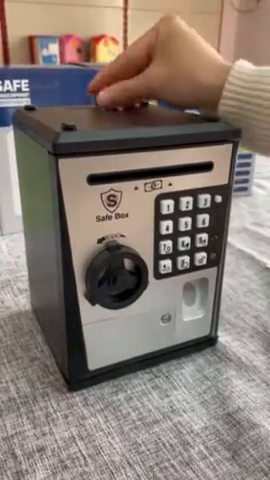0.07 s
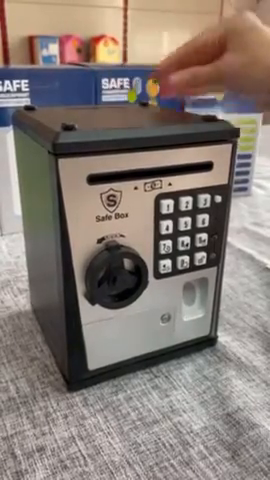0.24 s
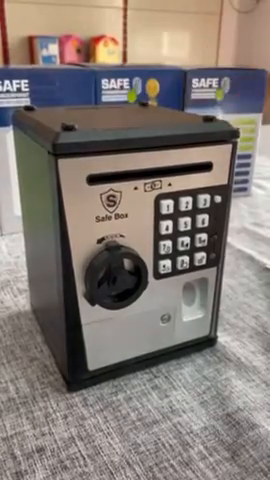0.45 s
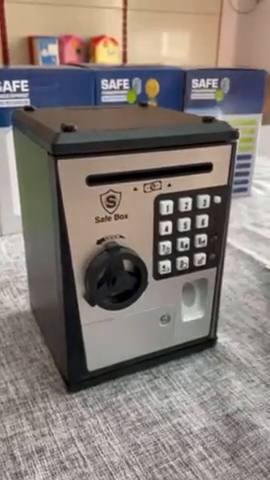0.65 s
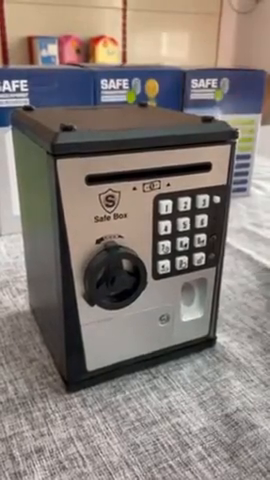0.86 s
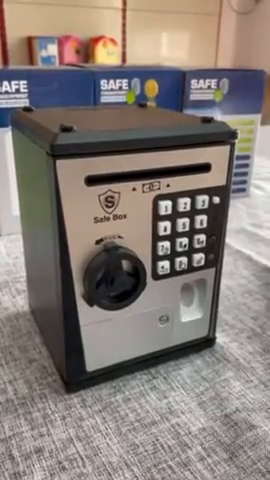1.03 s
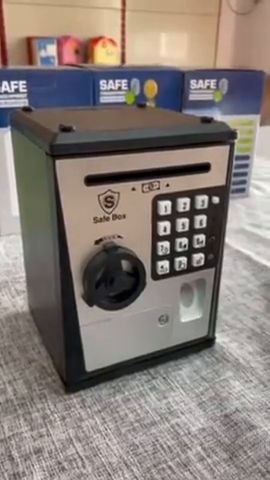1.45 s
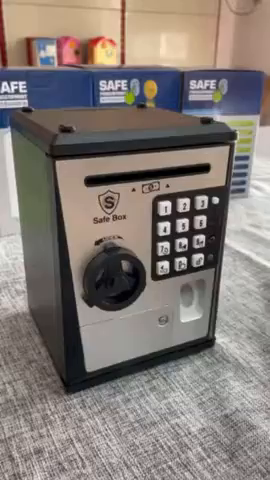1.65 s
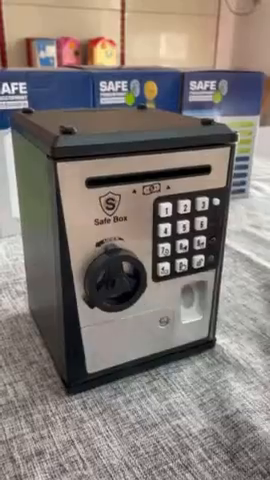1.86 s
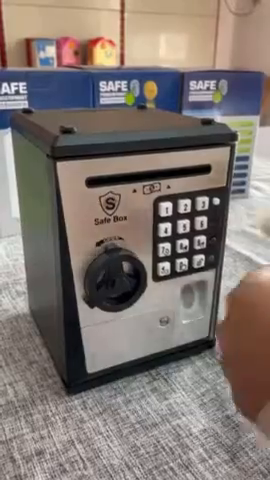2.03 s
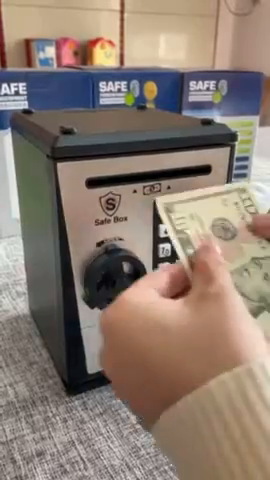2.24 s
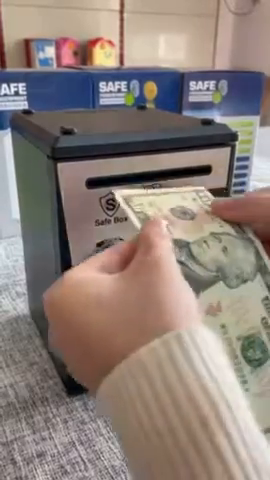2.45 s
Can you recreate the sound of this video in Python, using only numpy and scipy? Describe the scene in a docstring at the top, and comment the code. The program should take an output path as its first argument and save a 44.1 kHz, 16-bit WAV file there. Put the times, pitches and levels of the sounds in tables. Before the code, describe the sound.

Coin clattering into a plastic money box, then wobbling to rest with quickening ticks.

```python
"""A coin drops into a toy safe

A coin scrapes through the slot of a plastic toy safe in a small room. It lands and bounces twice,
making both box and coin ring. Then it wobbles on its ridged rim, rubbing the plastic in quickening
swells until it lies flat. A few dry snaps are heard, and a banknote crinkles faintly afterwards.
An appliance hums in the background over a low rumble."""
import sys
import numpy as np
from scipy import signal
from scipy.fft import rfft, irfft
from scipy.io import wavfile

SR = 44100
rng = np.random.default_rng(int(sys.argv[2]) if len(sys.argv) > 2 else 0)


def generate_wav(signal):
    """Clip the signal to [-1, 1] and save it as 16-bit WAV at the path in sys.argv[1]."""
    frames = np.transpose(np.atleast_2d(signal))
    scaled = np.clip(frames, -1, 1) * 32767
    pcm = np.round(scaled).astype(np.int16)
    wavfile.write(sys.argv[1], SR, pcm)


N = 114660
TIME = np.arange(N) / SR
FREQS = np.maximum(np.fft.rfftfreq(N, 1 / SR), 1)
BOX_CONTACT_HZ = 4940   # pushes on the box are softened above this pitch
RIGHT_LAG_S = 0.0001968   # the box is nearer to the left ear

# Each rub or wobble of the rim: (middle [s], level [dB], half-width [s], pitch of the box floor [Hz])
ROLLS = [(.106, -42.5, 0.0069, 1655), (0.232, -24.5, 0.0056, 1500), (0.284, -24.5, 0.0051, 1690),
         (0.438, -28, 0.022, 1660), (0.511, -34, 0.0074, 1600), (0.542, -26, 0.016, 1615),
         (0.62, -26.5, 0.0079, 1660), (.700, -26.5, 0.0075, 1790), (0.777, -25, 0.0055, 1660),
         (0.85, -24.5, 0.0044, 1450), (0.921, -28.5, 0.0068, 1700), (0.986, -31, 0.0082, 1760),
         (1.05, -28.5, 0.0057, 1790), (1.116, -28, 0.0058, 1548), (1.172, -26, 0.006, 1593),
         (1.227, -26.5, 0.0045, 1640), (1.28, -31.5, 0.011, 1694), (1.332, -30.5, 0.0082, 1692),
         (1.379, -28.5, 0.0061, 1526), (1.425, -25, 0.0045, 1573), (1.467, -26.5, 0.0057, 1581),
         (1.506, -31, 0.0088, 1558), (1.541, -31, 0.0069, 1730), (1.574, -33, 0.012, 1611),
         (1.606, -26.5, 0.0042, 1680), (1.634, -26.5, 0.0048, 1580), (1.66, -33, 0.0073, 1607),
         (1.684, -32.5, 0.0081, 1437), (1.698, -32, 0.0052, 1578), (1.715, -29.5, 0.004, 1720),
         (1.725, -34.5, 0.003, 1500)]
# The box's natural tones. A fade time, or t60, is how long a sound takes to drop by 60 dB.
# (pitch [Hz], fade time [s], level when struck [dB], level when rolled on [dB], left minus right [dB])
BOX_TONES = [(361.7, 0.061, -0.5, -3, 8), (409, 0.042, -1.5, -14, 3), (666.6, 0.049, -1, -2.5, 13.5),
             (828, 0.12, -19.5, -17, 16.5), (902, 0.059, -8.5, -15.5, 4), (1006, 0.044, -10.5, -20, 29),
             (1270, 0.042, -7.5, -4, 12.5), (1552, 0.0097, -1.5, 2, 21), (1585, 0.034, -19, -2, 4.5),
             (2275, 0.064, -22, -5.5, 16), (2816, 0.03, -9, 1, 4), (3014, 0.02, -9.5, -9.5, -13),
             (3368, 0.035, -6.5, -2.5, -12.5), (4417, 0.031, -9.5, -4, -6)]
# How far the sound of the plastic walls leans left: (frequency [Hz], left minus right [dB])
WALL_BALANCE = [(200, -0.5), (600, 22), (1300, 15), (2300, -4), (3400, 10), (5000, -0.5), (14000, 0)]
# How alike the plastic walls sound in both ears: (frequency [Hz], likeness [1 = same, 0 = unrelated])
WALL_LIKENESS = [(200, 0.27), (700, 0.96), (1500, 0.7), (4500, 0.23), (7600, 1), (10000, 0.77)]
# The same for the echo and the banknote: (frequency [Hz], likeness [-1 or less = opposite])
ROOM_LIKENESS = [(200, 1), (700, 0.5), (1300, 0.23), (2400, -0.028), (6500, -0.11), (7600, -2.3),
                 (9500, 0.44)]


def strikes():
    """Each blow is a crack, a plastic click, the hollow ring of the box and the thin ring of the coin."""
    # The coin hits the box:
    # (time [s], click [dB], box ring [dB], coin ring [dB], treble cut [Hz], bass cut [Hz])
    blows = [(0.1032, -30.5, -56, -48, 6140, 1410), (.2335, -2.5, -32, -64, 1900, 1610),
             (.2360, -8.5, -19.5, -41, 13200, 746), (0.238, -27, -15, -65, 1870, 360),
             (0.3704, -9.5, -29.5, -56, 8500, 700), (0.3724, -16, -12.5, -59, 5000, 250),
             (0.4146, -11.5, -43, -39, 11000, 1080), (0.416, -15.5, -19.5, -40, 7900, 800)]
    # The coin's natural tones; close pairs pulse together: (pitch [Hz], level [dB], fade time [s])
    coin_tones = [(7040, -26, 0.17), (9240, -8, 0.146), (9520, -14, .12), (12800, -13.5, .14),
                  (15100, -6.5, .14), (15400, -6, .13)]
    # The many short-lived tones of the plastic walls: (frequency [Hz], level [dB])
    click_tone = [(290, -20), (380, 15.5), (620, 7.5), (820, -3), (1500, 2), (1950, 6), (3300, 1),
                  (3800, -1), (4500, 2), (6000, -3.5), (7600, -12), (9800, -8.5), (13000, -14.5),
                  (16000, -45)]
    walls = colour(noise_pair(), click_tone, WALL_LIKENESS, at_hz(WALL_BALANCE, FREQS), RIGHT_LAG_S)
    impacts, on_box, on_coin = 0, 0, 0
    for s, click_db, box_db, coin_db, treble_hz, bass_hz in blows:
        click = from_db(click_db) * walls * rising(s, rise_s=0.00094) * dying(s, t60=0.045)
        crack = from_db(click_db + 8) * walls * dying(s, t60=0.002)   # the first instant of contact
        impacts += lowpass(highpass(click, bass_hz) + highpass(crack, hz=9000), treble_hz)
        on_box += lowpass(clicks([s], box_db), treble_hz)
        on_coin += lowpass(clicks([s], coin_db), treble_hz)
    box = box_ring(lowpass(on_box, BOX_CONTACT_HZ), [tone[2] for tone in BOX_TONES])
    coin = sum(from_db(db) * ring(on_coin, hz, t60) for hz, db, t60 in coin_tones)
    return impacts + box + coin


def rolling():
    """Scraping or rolling, the ridged rim makes a stream of tiny taps that swells once per wobble."""
    # Metal rubbing on plastic: (frequency [Hz], level [dB])
    rub_tone = [(200, -20.5), (600, 2), (1000, -3.5), (1800, 2.5), (3300, -0.5), (3800, -11), (5500, -8.5),
                (7600, -28), (9800, -22.5), (12500, -37), (16000, -61)]
    # The box rings less as the coin flattens: (time [s], level [dB])
    ring_levels = [(.5, -0.5), (1.0, 1), (1.45, -1), (1.62, -3.5), (1.72, -2)]
    taps_per_s, spread_db = 1600, 3
    pressure = rim_pressure()
    sizes = from_db(spread_db * np.clip(rng.standard_normal((3, N)), -2, 2))
    signs = rng.choice([-1, 1], (3, N))
    taps = (rng.random((3, N)) < taps_per_s / SR) * sizes * signs   # two rows rub, one shakes the box
    rub = colour(taps[:2], rub_tone, WALL_LIKENESS, at_hz(WALL_BALANCE, FREQS), RIGHT_LAG_S)
    ticks = rim_ticks(rub_tone)
    # The point of contact wanders, favouring one tone of the box and then another.
    levels_db = [tone[3] + 8 * np.tanh(drift(hz=10)) for tone in BOX_TONES]
    force = lowpass(taps[2], BOX_CONTACT_HZ)
    hollow = from_db(-8.5) * box_ring(force * pressure, levels_db) / np.std(box_ring(force, levels_db))
    floor = from_db(-7.5) * pan(db=5) * box_floor(force)
    ring_gain = from_db(np.interp(TIME, *np.transpose(ring_levels)))
    return from_db(-5) * pressure * rub + ticks + (hollow + floor) * ring_gain


def rim_pressure():
    """The rim bites just before the top of each swell and skips over the uneven floor of the box."""
    early_s = 0.003
    slaps = sum(from_db(db - 11.5) * dying(s - early_s, t60=0.013) for s, db, _, _ in ROLLS)
    skipping = from_db(np.tanh(drift(hz=250)))
    return (swells([row[:3] for row in ROLLS]) + lowpass(slaps, hz=404)) * skipping


def rim_ticks(tone, per_wobble=2, spread_db=5.5, t60=0.0082):
    """Single ridges of the rim tick unevenly around the top of each wobble."""
    hiss = highpass(colour(noise_pair(), tone, WALL_LIKENESS, 0, RIGHT_LAG_S), hz=2500)
    middle, db, width, _ = np.repeat(ROLLS, per_wobble, axis=0).T
    offset, size = rng.uniform(-1.1, 1, (len(middle), 2)).T
    hits = clicks(middle + offset * width, db - 3 + spread_db * size)
    fades = signal.lfilter([1], [1, -np.exp(-np.log(1000) / (t60 * SR))], hits + 1e-18)
    return lowpass(hiss * lowpass(fades, hz=1820), hz=6500)


def box_ring(force, levels_db):
    """A push sets the box's natural tones ringing, each leaning to its own side."""
    return sum((-1) ** k * from_db(db) * pan(side) * ring(force, hz, t60)
               for k, ((hz, t60, _, _, side), db) in enumerate(zip(BOX_TONES, levels_db)))


def box_floor(force, t60=0.024):
    """Each wobble presses on another spot of the box floor, which rings briefly at its own pitch."""
    spots = sum(ring(force * swells([(s, db, width)]), hz, t60) for s, db, width, hz in ROLLS)
    return spots / np.std(ring(force, ROLLS[0][3], t60))


def snaps():
    """Sharp, dry snaps: gives the direct sound and the part that echoes in the room."""
    # The snaps: (time [s], level [dB], fade time [s], share sent to the room [0 to 1])
    events = [(0.9361, -28.5, 0.019, 1.0), (0.9399, -18, 0.022, 0.51), (1.3103, -27.5, 0.012, .15),
              (2.092, -53, .012, .5), (2.1207, -46, 0.01, .5)]
    # Their bright tone: (frequency [Hz], level [dB])
    snap_tone = [(1000, -20), (1800, 7.5), (3000, 2), (6400, 3), (8800, -3.5), (11000, -12.5), (15000, -24),
                 (16000, -32)]
    hiss = colour(noise_pair(), snap_tone, WALL_LIKENESS, 0, RIGHT_LAG_S)
    direct, to_room = 0, 0
    for s, db, t60, share in events:
        snap = from_db(db) * hiss * rising(s, rise_s=0.00076) * dying(s, t60)
        direct += snap
        to_room += share * snap
    return direct, to_room


def bumps(hz=81.8):
    """The whole box rocks on its soft support with dull bumps."""
    # Each rocking motion: (middle [s], level [dB], half-width [s])
    rocks = [(.715, -32.5, 0.037), (.856, -27, 0.0092)]
    return swells(rocks) * np.sin(2 * np.pi * hz * TIME)


def banknote():
    """Paper crinkles softly and rustles as it slides between the fingers."""
    # The crinkles: (time [s], level [dB], fade time [s])
    crinkles = [(2.12, -34, 0.034), (2.131, -37.5, 0.023), (2.316, -48.5, 0.061)]
    # The slides: (middle [s], level [dB], half-width [s])
    slides = [(2.025, -68.5, 0.016), (2.335, -61, 0.0095)]
    # The tone of crinkling and of sliding paper: (frequency [Hz], level [dB])
    crinkle_tone = [(300, -29), (700, 0), (1200, 5.5), (2400, -0.5), (3500, -13), (6000, -15), (11000, -37),
                    (16000, -51)]
    slide_tone = [(500, -8), (2000, -11), (6000, 5), (10000, -7), (13000, -17), (16000, -37)]
    paper = colour(noise_pair(), crinkle_tone, ROOM_LIKENESS, 0)
    rustle = colour(noise_pair(), slide_tone, ROOM_LIKENESS, 0)
    bursts = sum(from_db(db) * dying(s, t60) for s, db, t60 in crinkles)
    return paper * lowpass(bursts, hz=1500) + rustle * swells(slides)


def room(x, build_s=0.0042):
    """Reflections blur into one short echo, each band of pitches fading at its own speed."""
    # How long the echo lasts: (frequency [Hz], fade time [s])
    fade_times = [(200, 0.44), (1000, 0.51), (3000, 0.61), (6000, 0.53), (10000, 0.3), (16000, 0.25)]
    # How strong it is: (frequency [Hz], level [dB])
    echo_levels = [(200, -12.5), (500, -9), (1500, -7), (4000, -7), (7500, -3.5), (10000, -3),
                   (16000, -19.5)]
    edges, tail = np.geomspace(150, 17000, 13), 0
    t, white = TIME[:SR], rng.standard_normal((2, 2, SR))
    for k, (low, high) in enumerate(zip(edges, edges[1:])):
        hz = np.sqrt(low * high)
        shape = from_db(-60 * t / at_hz(fade_times, hz)) * (1 - np.exp(-t / build_s))
        band = signal.sosfilt(signal.butter(2, [low, high], "band", fs=SR, output="sos"), white[k % 2])
        tail += band * shape / np.linalg.norm(shape) * from_db(at_hz(echo_levels, hz))
    tail = irfft(stereo(tail, ROOM_LIKENESS, 0), N)[:, :SR]
    return signal.fftconvolve(x[:1] / 2, tail, axes=1)[:, :N]


def background(hum_hz=122.8, wander_hz=4.56, overtone_hz=495):
    """Low room rumble and a wavering appliance hum with one faint overtone."""
    # The room's rumble: (frequency [Hz], level [dB])
    rumble_tone = [(25, -9.5), (42, -39), (62, 4), (85, 3.5), (105, -3.5), (160, -4), (300, -4.5),
                   (480, -14), (800, -22), (1600, -32), (3200, -43.5), (6000, -54.5), (8000, -73),
                   (10500, -61), (16000, -79)]
    # How alike it is in both ears: (frequency [Hz], likeness [1 = same])
    rumble_likeness = [(60, 1), (250, 0.99), (800, 0.046), (2500, 0.12), (10000, 0.75)]
    left_db = 2.5
    rumble = from_db(-38) * colour(noise_pair(), rumble_tone, rumble_likeness, left_db)
    phase = 2 * np.pi * np.cumsum(hum_hz + wander_hz * drift(hz=7.8)) / SR
    hum = from_db(-42.5) * rms_one(np.sin(phase) * (1 + 0.54 * drift(hz=4.4)))
    overtone = from_db(-56.5) * rms_one(np.sin(2 * np.pi * overtone_hz * TIME))
    return rumble + pan(left_db) * (hum + overtone)


def from_db(db):
    """Turn decibels into a multiplier."""
    return 10 ** (np.asarray(db) / 20)


def rms_one(x):
    """Scale a signal so its average strength (rms) is 1."""
    return x / np.sqrt(np.mean(x ** 2) + 1e-20)


def at_hz(points, hz):
    """Read between the rows of a table, with octaves evenly spaced."""
    f, value = np.transpose(points)
    return np.interp(np.log(hz), np.log(f), value)


def pan(db):
    """Left and right multipliers that make the left louder by db."""
    return from_db(np.array([[.5], [-.5]]) * db)


def lowpass(x, hz):
    """Gently cut the treble above hz."""
    return signal.sosfilt(signal.butter(2, hz, fs=SR, output="sos"), x + 1e-18)


def highpass(x, hz):
    """Gently cut the bass below hz."""
    return signal.sosfilt(signal.butter(1, hz, "high", fs=SR, output="sos"), x)


def noise_pair():
    """Two unrelated white noises."""
    return rng.standard_normal((2, N))


def drift(hz):
    """A random wander of typical size 1, mostly slower than hz."""
    return rms_one(irfft(rfft(rng.standard_normal(N)) / (1 + (FREQS / hz) ** 2), N))


def rising(s, rise_s):
    """A loudness curve that climbs from 0 to 1, starting at time s."""
    return 1 - np.exp(-np.maximum(TIME - s, 0) / rise_s)


def dying(s, t60):
    """A loudness curve that starts at time s and dies away."""
    return (TIME >= s) * from_db(-60 * np.maximum(TIME - s, 0) / t60)


def swells(rows, roundness=1.46):
    """A loudness curve of rounded rises and falls."""
    return np.sqrt(sum(from_db(db) ** 2 * np.exp(-np.minimum(np.abs((TIME - s) / width) ** roundness, 20))
                       for s, db, width in rows))


def ring(x, hz, t60):
    """One natural tone: each click in x starts a fading sine wave."""
    decay, step = np.exp(-np.log(1000) / (t60 * SR)), 2 * np.pi * hz / SR
    return signal.lfilter([0, np.sin(step)], [1, -2 * decay * np.cos(step), decay ** 2], x + 1e-18)


def clicks(times, db):
    """Clicks one sample long."""
    out = np.zeros(N)
    out[(np.asarray(times) * SR).astype(int)] = from_db(db)
    return out


def colour(pair, tone, likeness, pan_db, lag_s=0):
    """Shape two unrelated signals into one stereo sound of the given tone and strength 1."""
    return rms_one(irfft(stereo(pair, likeness, lag_s) * from_db(at_hz(tone, FREQS)) * pan(pan_db), N))


def stereo(pair, likeness, lag_s):
    """Mix two unrelated signals into left and right spectra, the right treble late by lag_s."""
    mid, side = rfft(pair, N)
    alike = np.clip(at_hz(likeness, FREQS), -1, 1)
    both = np.sqrt(1 + alike) * mid + np.sqrt(1 - alike) * side * [[1], [-1]]
    delay_s = lag_s / (1 + (2034 / FREQS) ** 10)   # lows leave the whole box and reach both ears at once
    return both * np.exp(-2j * np.pi * FREQS * delay_s * np.array([[0], [1]]))


def gain_control(x, limit_db=-14, share=0.39, recover_db_per_s=64.5, attack_s=0.061):
    """Turn the volume down after loud blows and let it slowly come back."""
    over_db = np.maximum(20 * np.log10(np.abs(x).max(0) + 1e-9) - limit_db, 0)
    held_db = np.maximum.accumulate(over_db + recover_db_per_s * TIME) - recover_db_per_s * TIME
    smooth = np.exp(-1 / (attack_s * SR))
    return x * from_db(-share * signal.lfilter([1 - smooth], [1, -smooth], held_db))


def scene():
    """Coin, box and banknote in the humming room."""
    direct = strikes() + rolling() + banknote()
    snap, snap_to_room = snaps()
    return direct + snap + room(direct + snap_to_room) + bumps() + background()


def record(dry):
    """Even out the volume, round off the peaks and cut the highest treble."""
    treble_cut = signal.ellip(10, .1, 80, 16100, fs=SR, output="sos")
    return signal.sosfilt(treble_cut, np.tanh(gain_control(dry)))


dry = scene()
out = record(dry)
generate_wav(out)
```